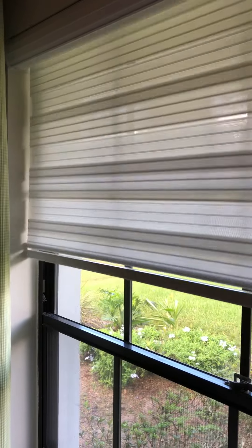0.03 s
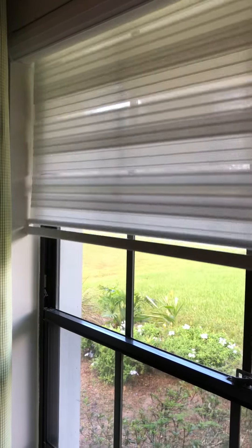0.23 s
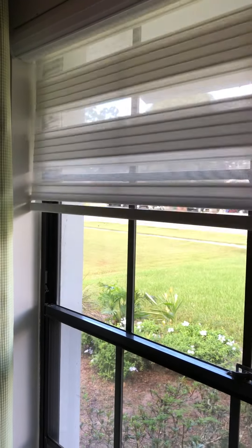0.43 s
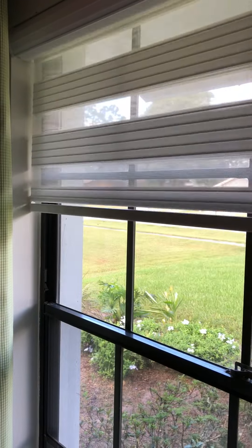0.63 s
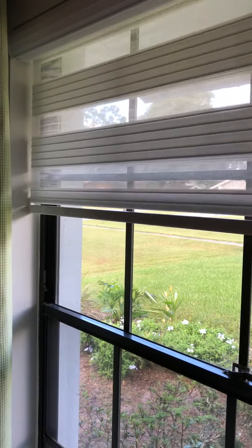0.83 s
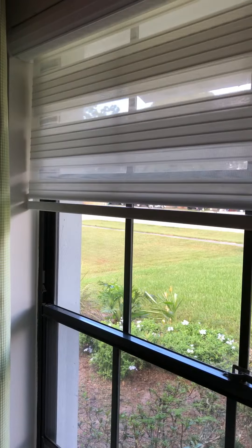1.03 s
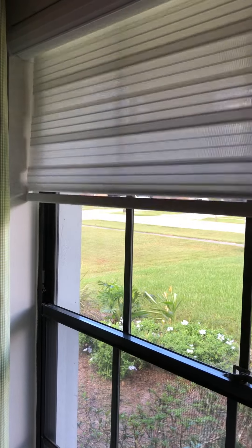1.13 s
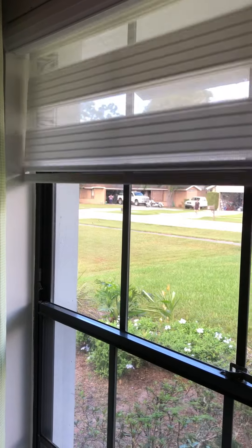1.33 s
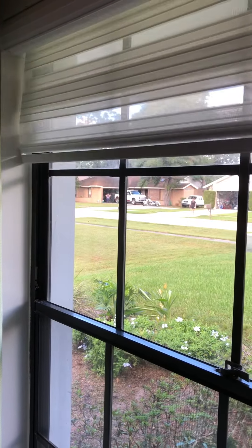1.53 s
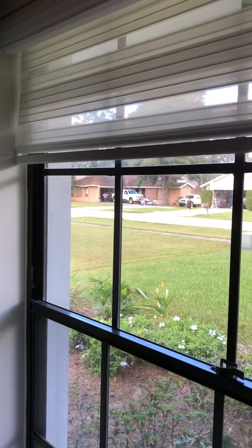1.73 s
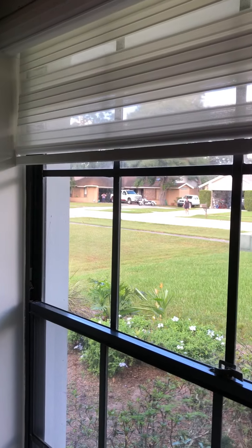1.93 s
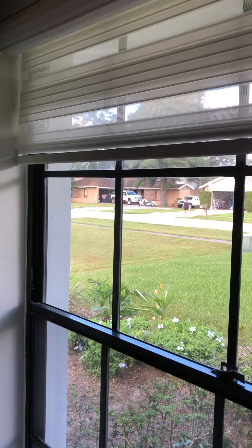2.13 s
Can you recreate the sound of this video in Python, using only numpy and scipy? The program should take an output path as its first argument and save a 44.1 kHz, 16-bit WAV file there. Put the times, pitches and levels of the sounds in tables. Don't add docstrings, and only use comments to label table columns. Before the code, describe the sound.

Roller shade raised by bead chain: two fast ticking, hissing whirs with soft knocks, quiet room

```python
import sys
import numpy as np
from scipy import signal
from scipy.fft import rfft, irfft, next_fast_len
from scipy.io import wavfile
from scipy.ndimage import uniform_filter1d, map_coordinates

SR = 44100
rng = np.random.default_rng(int(sys.argv[2]) if len(sys.argv) > 2 else 0)


def wav_record(signal):
    frames = np.transpose(np.atleast_2d(signal))
    bounded = np.clip(frames, -1, 1)
    quanta = np.round(bounded * 32767).astype(np.int16)
    wavfile.write(sys.argv[1], SR, quanta)


def gain_from_decibels(decibels):
    exponent = np.asarray(decibels, float) / 20
    return 10 ** exponent


N = 97020
T = np.arange(N) / SR

# t/s, rumble level/dB, fabric tension/dB
LOAD = [
    [(0, -63, 0), (.1, -55, 0), (.18, -49, -.5), (.26, -45, .5), (.44, -48, -1.5), (.52, -46, 2.5),
     (.57, -50, 1.5), (.65, -62, .5), (.71, -54, .5)],
    [(1.05, -64, 0), (1.1, -62, .5), (1.18, -46, 1.5), (1.3, -48, .5), (1.44, -47, -.5), (1.57, -44, .5),
     (1.65, -48, 1.5), (1.72, -61, .5), (1.76, -59, .5)],
]


def unit(x):
    return x / np.sqrt(np.mean(x ** 2) + 1e-20)


def along(points, hz):
    f, v = np.transpose(points)
    return np.interp(np.log(hz + 1), np.log(f + 1), v)


def wobble(rate_hz):
    return map_coordinates(rng.standard_normal(size=512), [T * rate_hz])


def filtered(x, response):
    m = next_fast_len(N + SR // 2)
    return irfft(rfft(x, m) * response(np.fft.rfftfreq(m, 1 / SR)), m)[:N]


def resonance(f, centre_hz, width_hz, db):
    damping = 1j * f * width_hz
    return gain_from_decibels(db) * damping / (centre_hz * centre_hz - f * f + damping)


def noise(spectrum):
    return unit(filtered(rng.standard_normal(N), lambda hz: gain_from_decibels(along(spectrum, hz))))


def patchy(x, depth_db):
    z = signal.stft(x, nperseg=512)[2]
    field = uniform_filter1d(rng.standard_normal(z.shape), size=3, axis=0)
    field = uniform_filter1d(field, size=4, axis=1)
    return signal.istft(z * gain_from_decibels(depth_db * unit(field)), nperseg=512)[1][:N]


def bead_times(travel):
    s, beads = np.transpose(travel)
    k = np.arange(beads[-1] + 1)
    i = np.minimum(np.searchsorted(beads, k, "right"), len(s) - 1) - 1
    h, slope = np.diff(beads)[i], np.gradient(s, beads)
    u = (k - beads[i]) / h
    ease = (s[i + 1] - s[i]) * u * u * (3 - 2 * u)
    bend = h * u * (1 - u) * (slope[i] * (1 - u) - slope[i + 1] * u)
    return s[i] + ease + bend


def bead_ticks(blows):
    # f/Hz, width/Hz, level/dB
    bead_modes = [(7140, 910, 4), (9600, 800, -5), (11200, 430, -2), (14500, 2900, -14)]

    def wheel(f):
        return sum((-1) ** k * resonance(f, *mode) for k, mode in enumerate(bead_modes))

    burst = rng.standard_normal(N) * signal.fftconvolve(blows, gain_from_decibels(-60 * T[:600] / .008))[:N]
    return 2.95 * filtered(blows + 0.12 * burst, wheel)


def fabric_hiss(speed):
    # f/Hz, density/dB per Hz
    fabric_spectrum = [(700, -23), (1500, -2), (3000, -5.5), (4500, -7.5), (6000, -10), (8500, -9.5),
                       (12000, -20), (15900, -20)]
    full_speed_db, speed_law = -50.5, 2.02
    s, _, tension_db = np.concatenate(LOAD).T
    flutter_db = .4 * wobble(12.9) + 1.2 * wobble(200)
    level_db = full_speed_db + np.interp(T, s, tension_db) + flutter_db
    return noise(fabric_spectrum) * gain_from_decibels(level_db) * speed ** speed_law


def chain():
    # t/s, beads passed
    chain_travel = [
        [(.0763, 0), (.1047, 1), (.1426, 3), (.1865, 6), (.2354, 10), (.3212, 16), (.3886, 21), (.4684, 28),
         (.5355, 34)],
        [(1.1223, 0), (1.1552, 1), (1.2046, 3), (1.3069, 8), (1.4051, 14), (1.488, 20), (1.5713, 27),
         (1.6311, 31), (1.6545, 32)],
    ]
    pull_tick_db = [-31.5, -37]
    full_speed_hz = 80
    start_s, coast_s = .045, .04
    tick_law, scatter_db = .5, 1.7
    speed, blows = np.zeros(N), np.zeros(N)
    for travel, tick_db in zip(chain_travel, pull_tick_db):
        s = bead_times(travel) - .0005
        pace = 1 / np.gradient(s) / full_speed_hz
        outside = np.minimum((T - s[0]) / start_s, (s[-1] - T) / coast_s)
        speed += np.interp(T, s, pace) * np.exp(np.minimum(0, outside))
        take_up = np.minimum(1, (s - s[0] + .012) / .028)
        level = gain_from_decibels(tick_db + scatter_db * rng.standard_normal(len(s)))
        blows[np.round(s * SR).astype(int)] = take_up * pace ** tick_law * level
    return bead_ticks(blows) + fabric_hiss(speed)


def roller():
    # f/Hz, width/Hz, level/dB
    tube_modes = [(148, 17, -3.5), (226, 130, -11.5), (330, 250, -1.5), (600, 240, 0), (920, 216, -5.5),
                  (1340, 156, -3.5), (1850, 14, -2.5), (2200, 170, -11.5), (3930, 1430, -16.5)]

    def tube(f):
        return np.sqrt(sum(abs(resonance(f, *mode)) ** 2 for mode in tube_modes))

    s, rumble_db, _ = np.concatenate(LOAD).T
    rub = patchy(rng.standard_normal(N), 2.2) * gain_from_decibels(1.4 * wobble(90) + .5 * wobble(18))
    moving = sum((T >= pull[0][0]) * (T < pull[-1][0]) for pull in LOAD)
    gate = uniform_filter1d(moving * 1., size=900)
    return unit(filtered(rub, tube)) * gain_from_decibels(np.interp(T, s, rumble_db)) * gate


def swells():
    # t/s, half length/s, f/Hz, peak level/dB
    short_tones = [(.0, 0.031, 92, -50.5), (.12, 0.021, 102, -52), (.24, 0.033, 80, -46.5),
                   (.42, .035, 78.5, -54), (.535, 0.026, 93, -45), (0.555, .008, 990, -37),
                   (0.258, 0.025, 600, -47), (0.74, .03, 96, -45.5), (0.825, .07, 77, -50.5),
                   (.84, 0.063, 158.8, -55), (1.197, .007, 752, -45), (1.317, 0.054, 89.4, -57.5),
                   (1.567, 0.048, 85.4, -45), (1.588, 0.013, 627.3, -40.5), (1.68, .04, 90, -56),
                   (1.8, 0.082, 77, -64), (1.899, 0.051, 72, -65), (.7365, .0015, 4600, -53),
                   (.7425, .0015, 4700, -48), (.77, .04, 350, -50), (2.194, .006, 800, -60),
                   (.62, 0.033, 1850, -64), (1.043, .005, 340, -48), (1.013, .004, 950, -51),
                   (1.111, .004, 400, -54), (1.765, .004, 320, -39), (.7205, .007, 325, -30),
                   (.7185, .005, 600, -29), (.46, .01, 2200, -50), (.505, .008, 858, -49)]
    out = np.zeros(N)
    for s, half_s, hz, db in short_tones:
        bell = np.exp(-((T - s) / half_s) ** 2)
        out += gain_from_decibels(db) * bell * np.sin(2 * np.pi * hz * (T - s) + wobble(4 + 0.054 * hz))
    return out


def crack_noise(top_hz, count):
    sos = signal.butter(2, [1100, top_hz], "band", fs=SR, output="sos")
    return signal.sosfilt(sos, rng.standard_normal(count))


def knocks():
    # t/s, thud level/dB, thud pitch ratio, crack level/dB, crack top f/Hz
    contacts = [(0.7118, -44, 1.05, -46, 13700), (.7148, -40, 1.01, -45, 11000),
                (.7192, -35, 1.01, -41, 7300), (.735, -47, .9, -52, 5420), (.742, -45, .8, -51, 5500),
                (0.754, -45, 1.1, -53, 6000), (1.005, -64, 1.1, -60, 5000), (1.009, -56.5, 1.02, -56, 4500),
                (1.7215, -64, 1.2, -61, 12100), (1.76, -49, .98, -55, 5000), (1.771, -54, 1.1, -46, 13500),
                (2.187, -56, 1.3, -64, 4000)]
    # f/Hz, level/dB, t60/s
    frame_modes = [(318, -0.5, 0.027), (600, 0, 0.03), (139, -11.5, 0.094), (962, -11, 0.046),
                   (1750, -16.5, 0.068), (4700, -24, .03)]
    # f/Hz, density/dB per Hz
    shudder_spectrum = [(60, -30), (150, -1.5), (330, 8.5), (600, -6), (1200, -14), (1900, -17),
                        (4500, -30), (9000, -56)]
    shudder_t60_s, shudder_db = .42, -13
    crack_t60_s, rattle_t60_s, rattle_db = 0.04, 0.27, -15.5
    out, shake, t = np.zeros(N + SR), np.zeros(N + SR), T[:SR // 2]
    for s, thud_db, ratio, crack_db, top_hz in contacts:
        ring = sum(gain_from_decibels(db - 60 * t / t60_s) * np.sin(2 * np.pi * hz * ratio * t)
                   for hz, db, t60_s in frame_modes)
        thud = gain_from_decibels(thud_db) * ring * (1 - np.exp(-t / 0.0013))
        crack = gain_from_decibels(-60 * t / crack_t60_s) * crack_noise(top_hz, len(t))
        rattle = gain_from_decibels(rattle_db - 60 * t / rattle_t60_s) * crack_noise(min(top_hz, 6500), len(t))
        shudder = gain_from_decibels(thud_db + shudder_db - 60 * t / shudder_t60_s) * (1 - np.exp(-t / 0.0065))
        i = round(s * SR)
        out[i:i + len(t)] += thud + gain_from_decibels(crack_db + 4) * (crack + rattle)
        shake[i:i + len(t)] += shudder
    return out[:N] + shake[:N] * noise(shudder_spectrum) * gain_from_decibels(1.9 * wobble(60))


def hand():
    # start t/s, swell/s, fade/s, level/dB
    hand_slides = [
        (.64, 0.17, 0.2, -63),
        (1.72, .3, 0.13, -63.5),
    ]
    # f/Hz, density/dB per Hz
    skin_spectrum = [(150, -26), (400, -7.5), (1400, -2.5), (4000, -7.5), (8000, -10.5), (15900, -21)]
    shape = np.zeros(N)
    for s, swell_s, fade_s, db in hand_slides:
        ramp = np.minimum((T - s) / swell_s, 1 - (T - s - swell_s) / fade_s)
        shape += gain_from_decibels(db) * np.sin(np.pi / 2 * np.clip(ramp, 0, 1))
    return shape * noise(skin_spectrum) * gain_from_decibels(1.2 * wobble(24.85))


def room(x):
    # f/Hz, t60/s
    room_decay = [(200, 0.38), (2000, 0.23), (10000, 0.15)]
    hz, t, z = signal.stft(rng.standard_normal(SR // 2), SR, nperseg=256)
    decay = gain_from_decibels(-60 * t / along(room_decay, hz)[:, None])
    tail = signal.istft(z * decay, SR, nperseg=256)[1]
    delayed = np.pad(x, (250, 0))
    return signal.fftconvolve(delayed, tail / np.linalg.norm(tail))[:N]


def still_air():
    # f/Hz, density/dB per Hz
    air_spectrum = [(30, -30), (55, 2.5), (104, -5.5), (261, -15.5), (1000, -20.5), (4000, -28.5),
                    (9990, -34), (15900, -36)]
    return gain_from_decibels(-64.5) * noise(air_spectrum)


def scene():
    shade = chain() + roller() + swells() + knocks() + hand()
    return (shade + gain_from_decibels(-13.5) * room(shade) + still_air())[None]


def top_cut(x):
    return signal.sosfilt(signal.butter(12, 16400, fs=SR, output="sos"), x)


def record(dry):
    mix = filtered(dry[0], lambda hz: hz < 15960)[None]
    return top_cut(mix)


dry = scene()
out = record(dry)
wav_record(out)
```